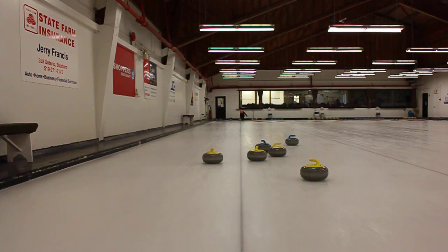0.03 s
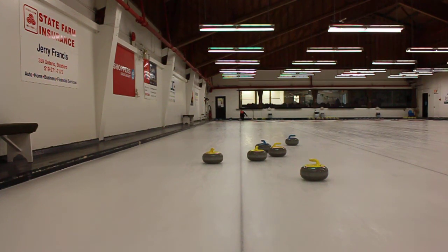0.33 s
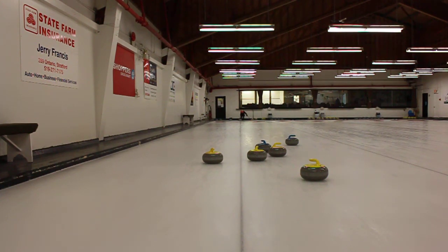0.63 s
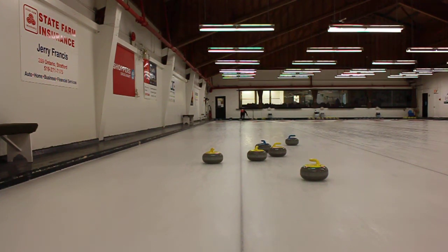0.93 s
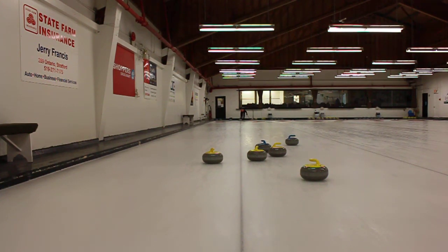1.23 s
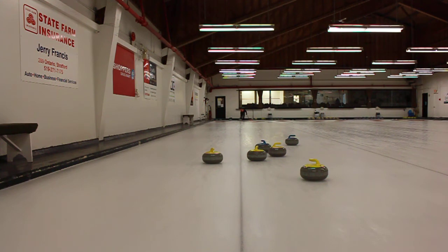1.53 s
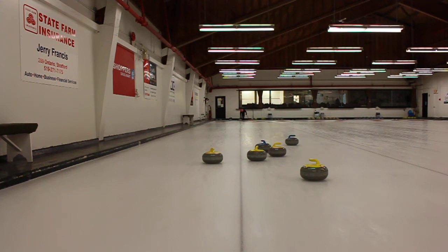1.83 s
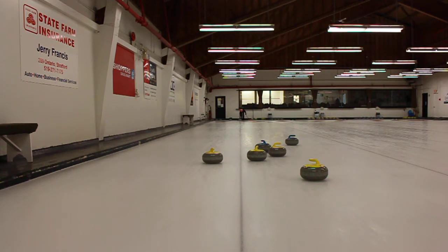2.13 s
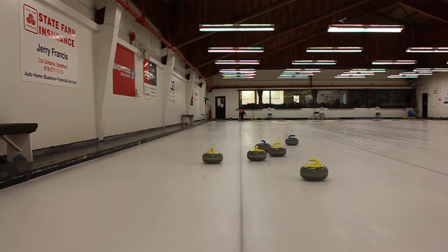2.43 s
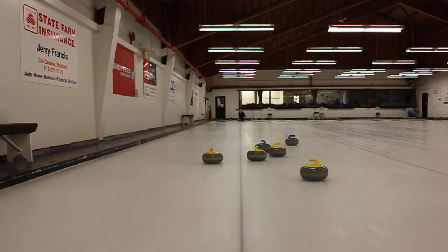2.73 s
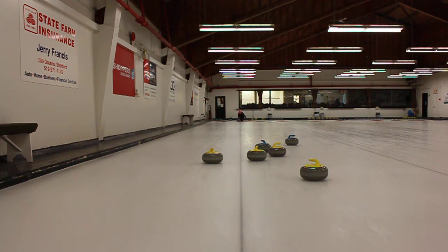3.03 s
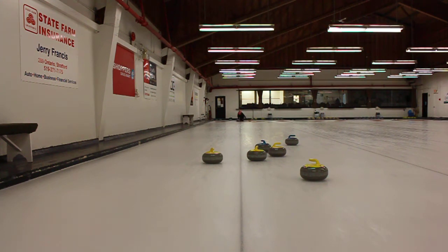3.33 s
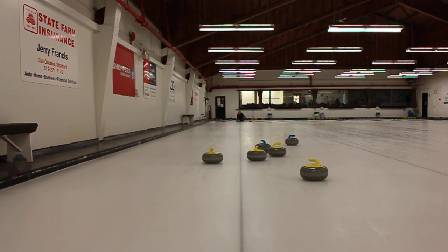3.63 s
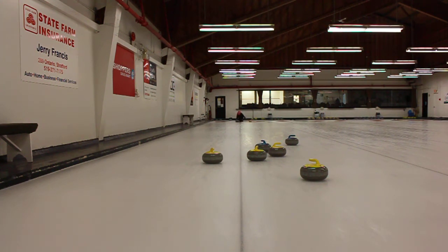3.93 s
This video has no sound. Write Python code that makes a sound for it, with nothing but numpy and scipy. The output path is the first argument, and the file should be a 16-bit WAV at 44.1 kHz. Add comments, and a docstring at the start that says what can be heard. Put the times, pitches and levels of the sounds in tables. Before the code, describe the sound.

A curling stone rumbles softly at the far end of an indoor rink, fades, then slides on with a deep roar and grainy hiss. Machinery hums throughout, with one sharp tick at the microphone and a few faint knocks.

```python
"""A large indoor curling rink, heard in mono, with machinery humming and ventilation rushing.
A stone is delivered from the far end. A soft first swell of rumble comes and goes; from about 2 s
the stone runs with a deep roar and a grainy rush, as its rim strikes thousands of ice pebbles a
second and sets stone and ice ringing into the hall. One sharp tick sounds right at the microphone,
and a few faint knocks come from out on the ice."""
import sys
import numpy as np
from scipy import signal
from scipy.fft import rfft, irfft
from scipy.io import wavfile

SR = 44100
rng = np.random.default_rng(int(sys.argv[2]) if len(sys.argv) > 2 else 0)


def materialize(psi):
    """Save the field psi as 16-bit PCM at rate SR to the path in sys.argv[1].

    A 1-D psi becomes a single channel; in a 2-D psi each row is a channel.
    """
    bounded = np.clip(np.atleast_2d(psi).T, -1, 1)
    quanta = np.round(bounded * 32767).astype(np.int16)
    wavfile.write(sys.argv[1], SR, quanta)


N = 176400
T = np.arange(N) / SR

# the stone's soft first swell, relative levels: time_s, rumble_db, rush_db
FIRST_SWELL = [(0, -78, -66), (.55, -47.5, -65.5), (.72, -36.5, -60), (.95, -38, -56), (1.2, -36.5, -54.5),
               (1.35, -40.5, -53.5), (1.55, -47.5, -60.5), (1.85, -49.5, -55.5), (2.3, -52, -63)]


def from_db(db):
    """Decibels to gain."""
    return 10 ** (np.asarray(db) / 20)


def rms_one(x):
    """Scale to rms 1."""
    return x / np.sqrt(np.mean(x ** 2) + 1e-20)


def gains(rows):
    """One gain curve per level column, fading in over the 0.1 s before the first row."""
    time_s, *columns = np.transpose(rows)
    fade = np.clip(1 + (T - time_s[0]) * 10, 0, 1)
    return [fade * from_db(np.interp(T, time_s, level_db)) for level_db in columns]


def drift(rate_hz):
    """A random wander, mostly slower than rate_hz, with a spread of 1."""
    hop, settle = 40, 2000
    pole = np.exp(-2 * np.pi * hop * rate_hz / SR)
    noise = rng.standard_normal(N // hop + settle + 2)
    slow = signal.lfilter([1], [1, -2 * pole, pole * pole], noise)[settle:]
    return np.interp(np.arange(N) / hop, np.arange(len(slow)), rms_one(slow))


def colour(x, spectrum):
    """Shape a steady sound with a spectrum; rms 1."""
    freq_hz, gain_db = np.transpose(spectrum)
    bins_hz = np.maximum(np.arange(N // 2 + 1) * SR / N, 1)
    response = from_db(np.interp(np.log(bins_hz), np.log(freq_hz), gain_db))
    return rms_one(irfft(rfft(x) * response, N))


def resonate(x, pitch_hz, width_hz):
    """Ring one damped resonance; rms 1."""
    radius = np.exp(-np.pi * width_hz / SR)
    feedback = [1, -2 * radius * np.cos(2 * np.pi * pitch_hz / SR), radius * radius]
    return rms_one(signal.lfilter([1, 0, -1], feedback, x))


def hall(x, t60_s=1.44, tail_db=-7):
    """Add the long diffuse tail of the rink to the direct sound."""
    tail = rng.standard_normal(N) * from_db(-60 * T / t60_s)
    tail /= np.sqrt(np.sum(tail ** 2))
    return x + from_db(tail_db) * signal.fftconvolve(x, tail)[:N]


def machinery(air_db=-43, waver_hz=2.15):
    """Room tone: wavering machine hum over the rush of ventilation."""
    # ventilation spectrum: freq_hz, gain_db
    air_spectrum = [(15, -23), (30, -15), (55, -8), (80, 0.5), (100, 2), (135, 2.5), (180, -1.5), (260, -1),
                    (370, -1.5), (470, -7), (700, -13), (1000, -17), (2000, -29.5), (3500, -30),
                    (7000, -34), (12500, -37.5), (15500, -42)]
    # hum lines: pitch_hz, level_db, waver_depth
    hum_lines = [(76.7, -55.5, 0.6), (83, -52, 0), (130.8, -56, 0.95), (141.7, -54.5, 1), (239.4, -51, .6),
                 (269.5, -51.5, 0.58), (348, -55.5, 0.4), (413, -51.5, 0.27)]
    # slow rise and fall applied to both: time_s, gain_db
    room_gain = [(0, -4.5), (.45, -4), (.9, 1), (2, -1), (4, 0)]
    room = from_db(air_db) * colour(rng.standard_normal(N), air_spectrum)
    for pitch_hz, level_db, waver_depth in hum_lines:
        waver = 1 + waver_depth * (drift(waver_hz) + 1j * drift(waver_hz))  # in level and phase
        tone = np.exp(2j * np.pi * (pitch_hz * T + rng.random()))
        room += from_db(level_db) * rms_one(np.real(waver * tone))
    return room * gains(room_gain)[0]


def knocks(t60_s=0.033):
    """Faint knocks and snaps out on the ice: short noise bursts that carry into the hall."""
    # each knock: start_s, level_db, pitch_hz
    events = [(1.423, -54, 3000), (1.597, -46, 1380), (2.446, -34, 3770), (2.809, -45.5, 7800),
              (2.84, -44, 6000)]
    bursts = np.zeros(N)
    for start_s, level_db, pitch_hz in events:
        decay_db = 60 * np.clip((T - start_s) / t60_s, 0, 2)
        band = resonate(rng.standard_normal(N), pitch_hz, width_hz=pitch_hz)
        band = resonate(band, pitch_hz, width_hz=pitch_hz)
        bursts += (T >= start_s) * from_db(level_db - decay_db) * band
    return hall(bursts)


def tick(start_s=.9403):
    """A dry tick right at the microphone: a hollow pop and a thin snap, dead within milliseconds."""
    # bands the tick excites: low_hz, high_hz, gain_db
    bands = [(786, 1410, 7), (1400, 3240, -9), (7400, 14000, -11)]
    impulse = np.full(N, 1e-18)
    impulse[int(start_s * SR)] = 1
    snap = np.zeros(N)
    for low_hz, high_hz, gain_db in bands:
        bandpass = signal.butter(4, [low_hz, high_hz], "band", fs=SR, output="sos")
        snap += from_db(gain_db) * signal.sosfilt(bandpass, impulse)
    return snap


def pebble_impacts(per_s=7000, spread_db=2):
    """Dense random impacts of the stone's rim on the ice pebbles."""
    sizes = from_db(spread_db * np.minimum(rng.exponential(1, N), 5))
    signs = rng.choice([-1, 1], N)
    return sizes * signs * (rng.random(N) < per_s / SR)


def sliding(spectrum, modes, flutter_db=0.5):
    """Pebble impacts drive a broad, reverberant response and a few resonances, fluttering slightly."""
    broad = colour(hall(pebble_impacts()), spectrum)
    rings = sum(from_db(level_db) * resonate(colour(pebble_impacts(), spectrum), pitch_hz, width_hz)
                for pitch_hz, width_hz, level_db in modes)
    return (broad + rings) * from_db(flutter_db * drift(rate_hz=11))


def crackle(per_s=45, pitch_hz=11000, t60_s=.02):
    """Ice grains snap under the rim, each a short bright burst; rms 1."""
    snaps = (rng.random(N) < per_s / SR) * rng.uniform(0.24, 1, N)
    envelope = signal.lfilter([1], [1, -from_db(-60 / (t60_s * SR))], snaps + 1e-18)
    return resonate(envelope * rng.standard_normal(N), pitch_hz, width_hz=pitch_hz / 2)


def ice_hiss(crackle_db=-12):
    """A fine hiss with crackle beneath it, strongest as the slide gets going."""
    # hiss spectrum: freq_hz, gain_db
    spectrum = [(1500, -18), (3500, 12), (6000, 7), (9000, 0.5), (11500, 1.5), (14000, 0), (16000, -13)]
    # hiss over the run: time_s, level_db
    levels = [(1.9, -65), (2.15, -53.5), (2.35, -49.5), (2.63, -53), (2.8, -59), (4, -57)]
    hiss = colour(hall(pebble_impacts()), spectrum)
    return (hiss + from_db(crackle_db) * crackle()) * gains(levels)[0]


def rim_treble():
    """The bright top of the rim's rush, surging three times."""
    # treble spectrum: freq_hz, gain_db
    spectrum = [(2000, -7), (3700, 1.5), (5000, -1), (5700, -4), (7000, -12), (8900, -13), (10500, -21.5),
                (15500, -36)]
    # the surges: time_s, level_db
    levels = [(2.1, -63), (2.45, -46.5), (2.63, -39.5), (2.82, -49.5), (3.1, -42), (3.4, -54), (3.65, -47),
              (3.85, -41.5), (4, -53)]
    return colour(pebble_impacts(), spectrum) * gains(levels)[0]


def ice_bass():
    """Deep bass of the impacts, carried by the ice and peaking late in the run."""
    # bass spectrum: freq_hz, gain_db
    spectrum = [(40, -52), (75, -15), (100, -7), (125, 2), (160, 5), (200, 4), (300, -9), (600, -65)]
    # bass over the run: time_s, level_db
    levels = [(1.9, -54), (2.3, -38.5), (2.55, -35.5), (2.85, -38.5), (3.15, -35.5), (3.35, -32.5),
              (3.55, -32.5), (4, -34.5)]
    return colour(pebble_impacts(), spectrum) * gains(levels)[0]


def first_swell():
    """A soft rumble from the far end that comes and goes before the long slide."""
    # swell spectrum: freq_hz, gain_db
    spectrum = [(80, -31), (135, -5), (190, 1), (240, 1), (315, 4.5), (365, -6.5), (430, -10.5), (520, -8),
                (700, -20.5), (1000, -21.5), (2000, -55)]
    # its resonances: pitch_hz, width_hz, relative_db
    modes = [(240.5, 15, -9), (280, 20, -7.5), (313, 20, -2.5)]
    return sliding(spectrum, modes) * gains(FIRST_SWELL)[0]


def rim_rush():
    """The grainy rush of the rim over the pebble, faint in the first swell and full in the slide."""
    # rush spectrum: freq_hz, gain_db
    spectrum = [(50, -49), (300, -22), (600, 2.5), (850, -2.5), (1100, 2), (1700, 1), (2300, -1.5),
                (3000, -6.5), (4000, -11.5), (5000, -19), (5700, -20), (7000, -29.5), (8800, -32.5),
                (10500, -40), (15500, -64)]
    # high resonances of stone and ice: pitch_hz, width_hz, relative_db
    modes = [(1008, 89, -15.5), (1253, 79, -10.5), (1585, 110, -20.5), (1934, 40, -16), (2135, 100, -10),
             (2500, 45, -25), (2860, 150, -15.5)]
    # rush over the run: time_s, relative_db
    levels = [(1.8, -58), (2.0, -49), (2.2, -40), (2.5, -31), (2.63, -22.5), (2.72, -23.5), (2.84, -26),
              (3.15, -24), (3.35, -24), (3.6, -24), (4, -24)]
    envelope = np.hypot(gains(FIRST_SWELL)[1], gains(levels)[0])  # the two add in power
    return sliding(spectrum, modes) * envelope


def stone_rumble():
    """The deep roar of the long slide: pebble impacts ring the low resonances of stone and ice."""
    # rumble spectrum: freq_hz, gain_db
    spectrum = [(40, -65), (100, -49), (170, -19.5), (215, -5.5), (290, -3.5), (360, -0.5), (420, -4),
                (520, -4.5), (700, -15.5), (1000, -18.5), (2000, -56.5)]
    # low resonances: pitch_hz, width_hz, relative_db
    modes = [(207.6, 21, -11.5), (230, 16, -12.5), (274.8, 23.5, -2), (305.7, 26, -9), (344.3, 19, -7),
             (456.4, 16, -13.5)]
    # rumble over the run: time_s, relative_db
    levels = [(1.8, -56), (2.0, -38), (2.21, -27.5), (2.42, -23), (2.62, -20.5), (3.05, -21.5),
              (3.32, -24.5), (4, -22)]
    return sliding(spectrum, modes) * gains(levels)[0]


def stone(rumble_gain_db=-4, rush_gain_db=-2):
    """The whole stone on the pebbled ice, from bass to hiss."""
    rumble = from_db(rumble_gain_db) * (first_swell() + stone_rumble())
    rush = from_db(rush_gain_db) * rim_rush()
    return rumble + rush + ice_bass() + rim_treble() + ice_hiss()


def scene():
    """Stone, room tone, close tick and faint knocks at one microphone."""
    return (stone() + machinery() + tick() + knocks())[None]


def record(dry, cutoff_hz=15600):
    """A steep low-pass takes off the very top."""
    return signal.sosfilt(signal.ellip(12, .1, 80, cutoff_hz, fs=SR, output="sos"), dry)


dry = scene()
out = record(dry)
materialize(out)
```